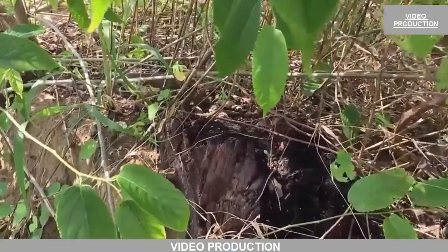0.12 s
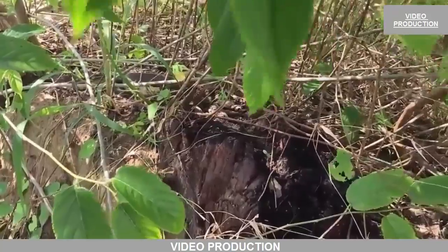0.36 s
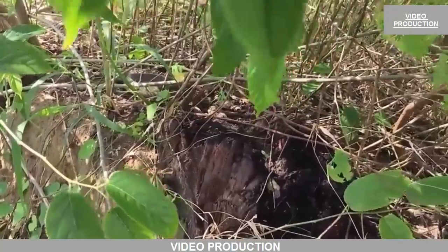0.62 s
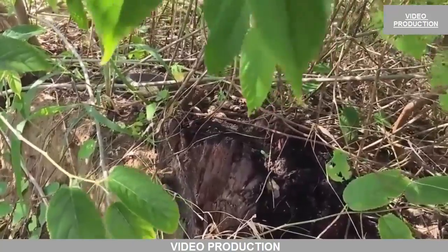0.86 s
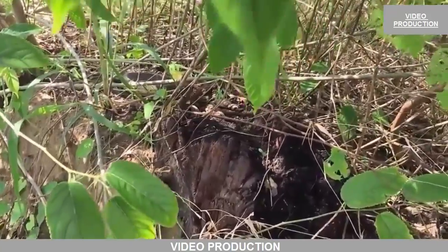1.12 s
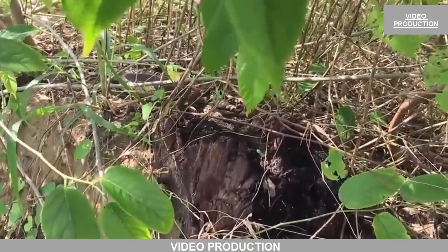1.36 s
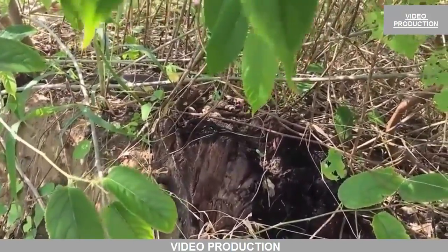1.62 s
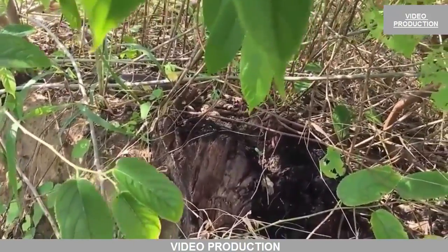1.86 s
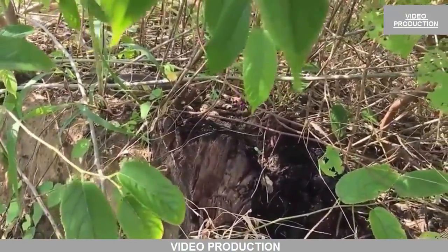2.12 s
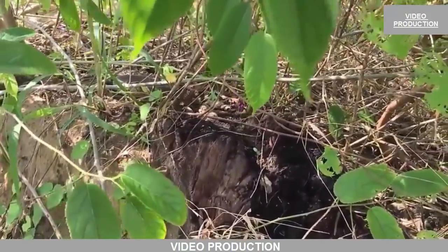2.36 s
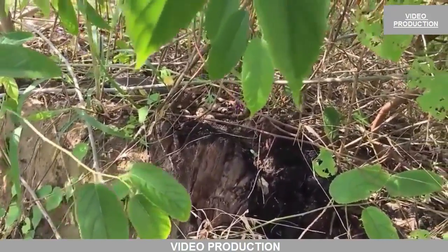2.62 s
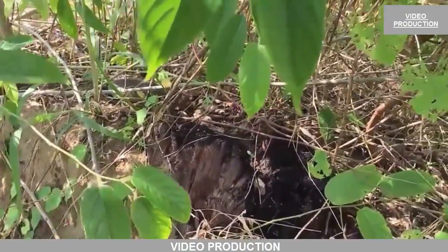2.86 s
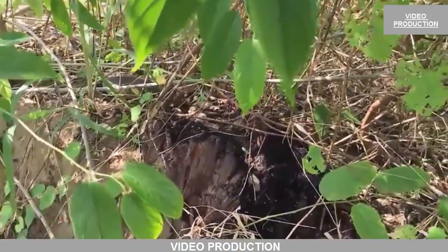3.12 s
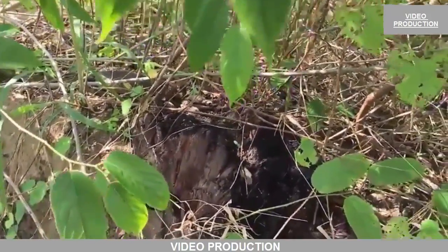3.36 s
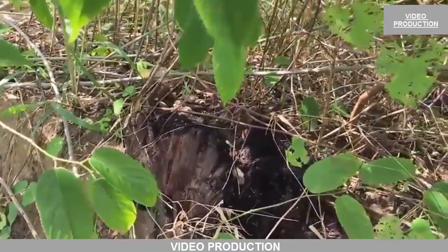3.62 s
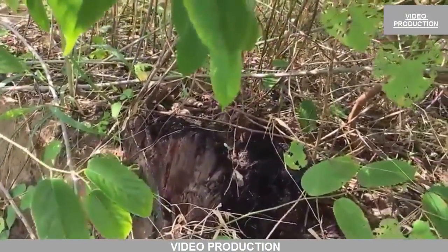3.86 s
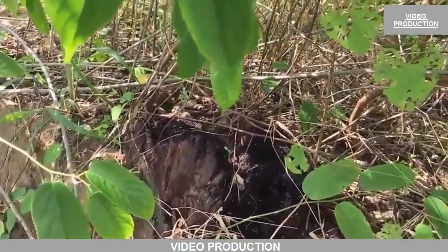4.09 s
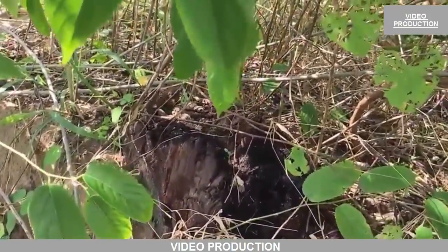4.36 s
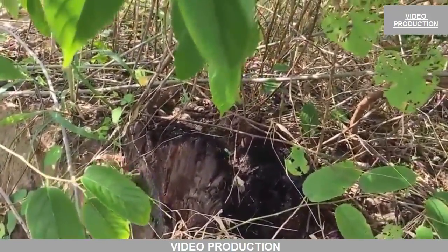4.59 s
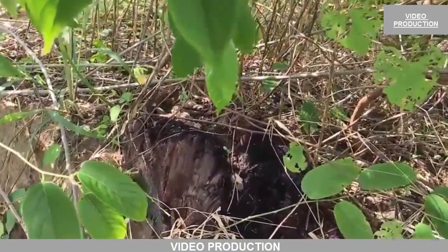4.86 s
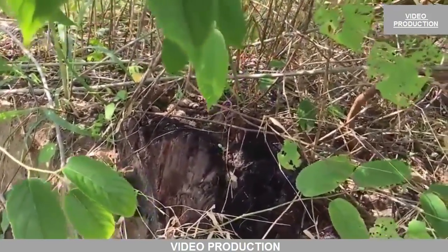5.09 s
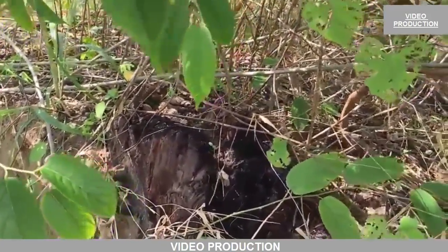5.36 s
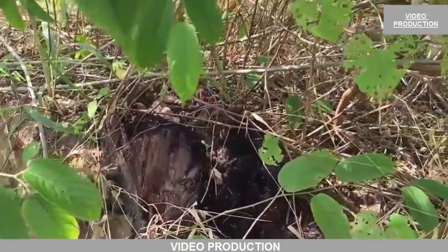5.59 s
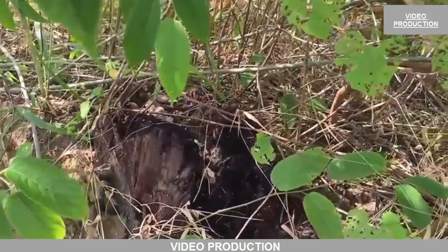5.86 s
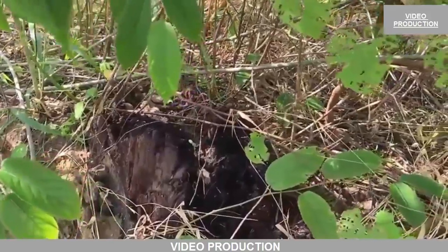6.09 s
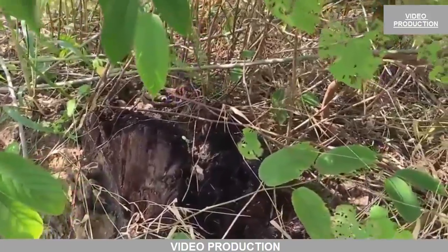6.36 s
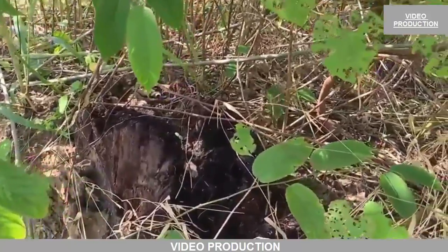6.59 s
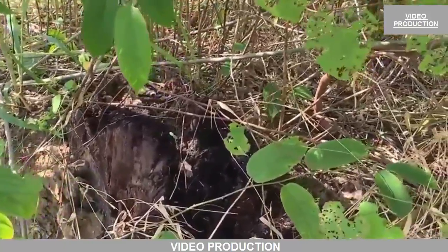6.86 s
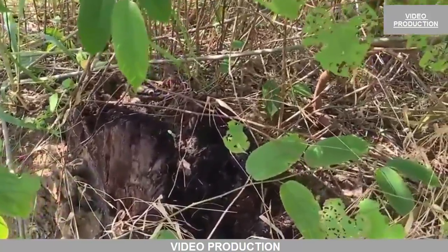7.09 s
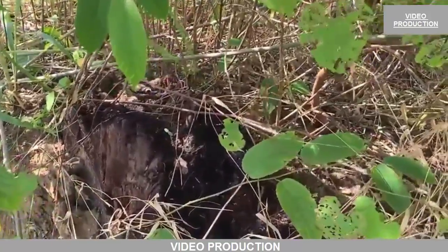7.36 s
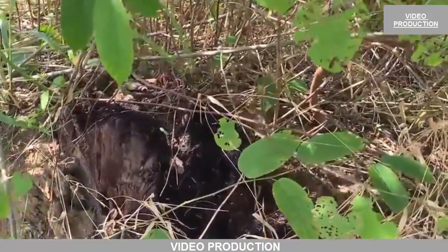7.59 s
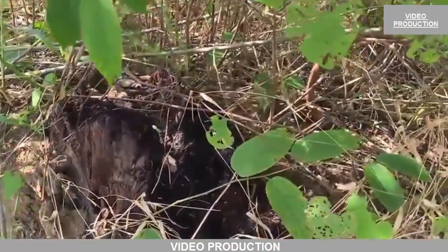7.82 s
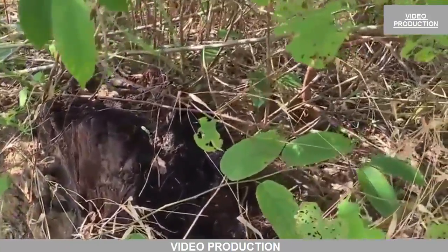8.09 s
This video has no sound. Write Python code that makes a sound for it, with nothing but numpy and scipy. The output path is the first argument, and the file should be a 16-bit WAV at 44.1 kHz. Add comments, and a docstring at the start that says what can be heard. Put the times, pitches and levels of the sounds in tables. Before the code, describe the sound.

A close, dry outdoor sound on a handheld phone. At 0 s leaves are already rustling loudly, with a hard bright crack at 0.2 s and another leafy swell near 0.4 s, fading by 0.8 s. From 1 to 3 s it is quiet: tiny ticks, faint woody taps, a few crisp clicks around 2.6 s, and soft low breeze buffets, strongest in the first 1.6 s. At 3.35-3.7 s several loud twig snaps crack together, then a branch drags free from 3.8 s, its swish fading over half a second. Single snaps at 4.6 and 4.9 s lead to a crackly cluster at 5.1-5.5 s. It thins around 6 s, with a short leafy brush at 6.65 s. From 7.2 to 7.9 s sharp snaps crowd in, brightest at 7.7 s, with low woody knocks and rustling, easing off by 8.2 s. Distant foliage hisses faintly throughout.

```python
"""Leaves rub in swells of tiny crackles as someone pushes through dry litter and thin twigs, close to
a handheld phone outdoors. The crackles are random breaks that shake bands of noise; twigs and stems snap
in short bright noise bursts, and thicker twigs knock with decaying tones.
A light breeze rumbles low on the microphone as slow-varying low noise; far foliage hisses faintly."""
import sys
import numpy as np
from scipy import signal
from scipy.fft import rfft, irfft
from scipy.io import wavfile
from scipy.ndimage import uniform_filter1d

SR = 44100
rng = np.random.default_rng(int(sys.argv[2]) if len(sys.argv) > 2 else 0)


def put_to_file(sound):
    """Save the sound as 16-bit audio at rate SR, in the file named by the first command-line argument."""
    columns = np.atleast_2d(sound).T  # one column per channel
    safe = np.clip(columns, -1, 1)
    whole_steps = np.round(safe * 32767)
    wavfile.write(sys.argv[1], SR, whole_steps.astype(np.int16))


def volts(x):
    """Linear amplitude factor 10**(x/20) for a level x in dB, scalar or array-like."""
    e = np.asarray(x, float) / 20
    return 10 ** e


N = 362214


def curve(table):
    """Level in dB per sample, joined by straight lines in time."""
    time_s, level_db = np.transpose(table)
    return np.interp(np.arange(N) / SR, time_s, level_db)


def unit(x):
    """Scale to rms 1."""
    return x / np.sqrt(np.mean(x ** 2))


def colour(x, points):
    """Filter with (Hz, dB) points, joined on a log-frequency axis."""
    hz, db = np.transpose(points)
    f = np.fft.rfftfreq(len(x), 1 / SR) + 1
    gain = volts(np.interp(np.log(f), np.log(hz), db))
    return irfft(rfft(x) * gain, len(x))


def band(x, lo_hz, hi_hz):
    """Band-pass."""
    return signal.sosfilt(signal.butter(2, [lo_hz, hi_hz], "band", fs=SR, output="sos"), x)


def walk(rate_hz):
    """Random levels held 1 / rate_hz and slewed twice; spread near 1."""
    hold = int(SR / rate_hz)
    steps = np.repeat(rng.standard_normal(N // hold + 1), hold)
    slewed = uniform_filter1d(uniform_filter1d(steps, hold), hold)
    return 1.3 * slewed[:N]


def crackle(per_s, spread_db, t60_s):
    """How hard leaves shake: tiny breaks of widely spread size, each dying away in a moment."""
    size = volts(spread_db * np.minimum(rng.exponential(size=N), 5))
    breaks = (rng.random(N) < per_s / SR) * size
    pole = np.exp(-np.log(1000) / (t60_s * SR))
    return unit(signal.lfilter([1], [1, -pole], breaks))


# steady stirring of the litter: (time [s], level [dB])
STIRRING = [(0.0, -31), (0.3, -32.5), (0.6, -43), (1.0, -54), (1.8, -57), (2.2, -48), (2.9, -57.5),
            (3.3, -38.5), (3.65, -47.5), (4.3, -57), (4.9, -42), (5.5, -46.5), (5.8, -56.5), (6.05, -44),
            (6.5, -54), (7.05, -57), (7.3, -56), (7.9, -51.5), (8.21, -45.5)]
# pushes into the leaves: (peak time [s], peak level [dB], fall length [s])
PUSHES = [(0.0, -18.5, 0.023), (0.217, -25, 0.1), (0.38, -22.5, 0.22), (0.917, -39, 0.086),
          (1.134, -43.5, 0.094), (1.319, -43.5, 0.13), (1.47, -47, 0.041), (1.665, -49.5, 0.1),
          (2.024, -45.5, 0.13), (2.21, -41, 0.073), (2.677, -49.5, 0.41), (3.15, -46, 0.05),
          (3.39, -34, 0.1), (3.564, -40.5, 0.43), (3.75, -37.5, 0.14), (4.476, -44.5, 0.093),
          (4.66, -35.5, 0.09), (4.782, -37.5, 0.092), (4.973, -42.5, 0.47), (5.323, -31.5, 0.077),
          (5.466, -37.5, 0.26), (5.975, -49, 0.21), (6.22, -42.5, 0.1), (6.344, -42, 0.16),
          (6.587, -45.5, 0.09), (6.663, -30, 0.047), (6.775, -41.5, 0.071), (6.92, -44, 0.21),
          (7.116, -36.5, 0.083), (7.246, -37, 0.36), (7.348, -39, 0.14), (7.497, -30, 0.037),
          (7.632, -32, 0.28), (7.876, -35.5, 0.11), (8.11, -36, 0.063)]
RISE_SHARE, FADE_DB = 0.66, 21.5  # rise length / fall length; drop from the peak over either length
DRAG_START_S, DRAG_DB, DRAG_LENGTH_S = 3.773, -33, 0.57


def effort():
    """Gain of the leaves: powers of stirring, swelling pushes and a dragged branch that slides free add."""
    t = np.arange(N) / SR
    power = volts(2 * curve(STIRRING))
    for peak_s, peak_db, length_s in PUSHES:
        away = np.where(t < peak_s, (peak_s - t) / RISE_SHARE, t - peak_s) / length_s
        power = power + volts(2 * (peak_db - FADE_DB * np.minimum(away, 5)))
    catch = np.clip((t - DRAG_START_S) / 0.0023, 0, 1)
    slide_db = DRAG_DB - FADE_DB * ((t - DRAG_START_S) / DRAG_LENGTH_S) ** 2
    power = power + catch * volts(2 * slide_db)
    return np.sqrt(power)


# colour shared by leaves and snaps, with the phone microphone's dips in it:
# (frequency [Hz], level per Hz [dB])
SHARED_COLOUR = [(150, 0), (250, -5.5), (804, -9.5), (2220, -3.5), (2820, -5.5), (3710, -2), (4890, -3),
                 (6010, 0), (7910, -2.5), (9080, 0), (10600, -5), (12400, -1.5), (15200, -3.5)]
RUB_POWER = 0.9


def rustle():
    """Leaves crackle partly all together, partly size by size, over a smooth rub; stiff ones ring briefly."""
    together = crackle(400, 2.5, 0.02)
    out = np.zeros(N)
    for hz in 250 * 2 ** np.arange(0, 6.3, 0.5):  # one leaf size per half octave
        slow = crackle(80, 2.5, 0.055)
        quick = crackle(100, 2.2, 0.0091)
        shake = np.sqrt(together ** 2 + 0.53 * slow ** 2 + 0.14 * quick ** 2 + RUB_POWER)
        leaves = band(shake * rng.standard_normal(N), hz / 2 ** 0.25, hz * 2 ** 0.25)
        out = out + leaves * volts(1.6 * walk(20))
    for hz in 600 * 25 ** rng.random(30):
        strikes = crackle(15, 2.0, 0.04) * rng.standard_normal(N)
        out = out + 0.7 * signal.lfilter(*signal.iirpeak(hz, hz / 250, SR), strikes)  # 250 Hz wide
    out = out * volts(walk(50))
    return unit(colour(out, SHARED_COLOUR)) * effort()


# breeze: (time [s], level [dB])
BREEZE = [(0.0, -52), (0.09, -29.5), (0.16, -43.5), (0.82, -37), (1.3, -48.5), (1.37, -34.5), (1.53, -39),
          (1.58, -34.5), (2.4, -49), (3.75, -44.5), (5.85, -53), (6.63, -47.5), (6.72, -61), (6.97, -49.5),
          (7.5, -58.5), (7.55, -45), (7.61, -57.5), (8.21, -48)]
# breeze colour: (frequency [Hz], level per Hz [dB])
RUMBLE = [(12, -31), (20, -31), (47, 2), (70, 3.5), (129, -12), (206, -33.5), (289, -74), (880, -120)]


def breeze():
    """Eddies of air buffet the microphone port in low pushes; stronger gusts shed smaller, higher eddies."""
    level_db = curve(BREEZE)
    eddies = unit(colour(rng.standard_normal(N), RUMBLE) * volts(1.2 * walk(8.3)))
    small = band(eddies, 100, 216) * volts(0.5 * (level_db + 29.5))
    return (eddies + small) * volts(level_db)


# far foliage colour: (frequency [Hz], level per Hz [dB])
FOLIAGE = [(88, -29), (150, -10.5), (326, -17), (583, -19.5), (877, -23), (1040, -21.5), (15500, -42)]
FOLIAGE_DB = -62


def air():
    """Distant foliage hisses smoothly: coloured noise with a slight drift in level."""
    return unit(colour(rng.standard_normal(N), FOLIAGE)) * volts(FOLIAGE_DB + 1.5 * walk(12))


# twig and stem snaps; dull and bright parts are relative to the shared colour:
# (time [s], peak level [dB], dull part [dB], bright part [dB], t60 [s])
SNAPS = [(0.2105, 3, -2, 22, 0.021), (0.2284, -23.5, 15, -10, 0.14), (0.9306, -25.5, -5, -18, 0.05),
         (1.2002, -30.5, -2, -30, 0.019), (1.2488, -31, -4, -10, 0.048), (1.356, -23.5, -23, 3.5, 0.04),
         (1.4752, -27, -0.5, -3.5, 0.039), (1.524, -34.5, -12, -2, 0.022), (1.5828, -36, 3, 1, 0.03),
         (1.7542, -41.5, 19, -20, 0.049), (2.446, -38.5, 11, -10, 0.062), (2.606, -26.5, -20, 10, 0.043),
         (2.6197, -26, -18, 12, 0.05), (2.6377, -18, 2, 4, 0.065), (2.664, -28.5, 7, -2, 0.046),
         (2.9568, -26.5, 3, 4, 0.086), (2.997, -26.5, 5.5, -18, 0.05), (3.1587, -23, 2, -0.5, 0.091),
         (3.3643, -10, 1, 11, 0.032), (3.4012, -5, -6, 7, 0.057), (3.4048, -9, 6.5, 11.5, 0.043),
         (3.4508, -16, -24, -4, 0.027), (3.486, -18, -13, 8, 0.086), (3.533, -15, 2, -1.5, 0.078),
         (3.551, -25.5, 20, -12, 0.034), (3.589, -26, -4, -2, 0.068), (3.7071, -10.5, 3.5, 6, 0.044),
         (3.776, -19, -8, -5, 0.042), (4.179, -26, 6, 2, 0.098), (4.2866, -33.5, 11, -16, 0.033),
         (4.348, -32, -10, -6, 0.045), (4.4546, -31, -17, -24, 0.035), (4.626, -12, -6, -13, 0.019),
         (4.654, -26, 4, -9, 0.04), (4.667, -29, 9, -14, 0.069), (4.687, -27, 7, -6, 0.027),
         (4.705, -32, 3, -17, 0.025), (4.868, -9.5, -18, -4, 0.021), (5.078, -15.5, 3, 11, 0.04),
         (5.198, -17.5, -2, 8, 0.044), (5.267, -25, -10, 5, 0.06), (5.2863, -18, -11, -9, 0.044),
         (5.3194, -16.5, 9, -3, 0.025), (5.3296, -14.5, 10, 7.5, 0.082), (5.363, -21.5, 0, 0, 0.029),
         (5.437, -15.5, -24, 6, 0.053), (5.4403, -13, -22, 3, 0.061), (5.4676, -25, -4, -14, 0.027),
         (5.552, -26.5, 15.5, 2.5, 0.14), (5.858, -25, 9.5, 1.5, 0.03), (6.053, -23.5, -5, 6, 0.06),
         (6.226, -17.5, 1, 5, 0.085), (6.353, -17, -40, 4.5, 0.13), (6.5684, -23, -4, -2, 0.031),
         (6.981, -23.5, 5, 0, 0.082), (7.222, -17, -24, -2, 0.072), (7.243, -8.5, 4.5, 7.5, 0.06),
         (7.3345, -12.5, -14, 9, 0.038), (7.356, -3.5, -1.5, 7, 0.032), (7.3753, -17, -36, -5, 0.046),
         (7.4801, -9, 0.5, 2.5, 0.035), (7.4887, -15, -16, 8, 0.05), (7.6074, -15, 2, -5.5, 0.12),
         (7.699, -7, 1, 18, 0.031), (7.7047, -3.5, -14, 17.5, 0.0097), (7.733, -17, -5, 11, 0.29),
         (7.771, -6.5, 6.5, -1, 0.025), (7.8352, -8, -2.5, 0.5, 0.062), (7.8408, -14.5, 2, -2, 0.075),
         (7.861, -14, -41, -20, 0.025), (8.1019, -17, -7, -16, 0.02)]
DULL_HZ, MID_HZ, BRIGHT_HZ = 1200, 5000, 13000
TRAIL_DB, TRAIL_T60_S = -28, 0.29


def snaps():
    """Each break is a ragged burst that rings a few leaves; shaken leaves nearby trail after it."""
    out, t = np.zeros(N + SR), np.arange(SR // 8) / SR
    for time_s, peak_db, dull_db, bright_db, t60_s in SNAPS:
        fall = volts(-60 * t / t60_s) + volts(TRAIL_DB - 60 * t / TRAIL_T60_S)
        # fibres part one after another, so the burst is lumpy
        lumps = np.repeat(volts(3.5 * rng.standard_normal(len(t) // 24 + 1)), 24)[:len(t)]
        lumps[24:72] = volts(4.5)  # the first crack is always firm
        rise = np.minimum(t / (0.026 * t60_s), 1)
        burst = rise * fall * lumps * rng.standard_normal(len(t))
        leaves_hz = 3000 * 5 ** rng.random(5)
        ringing = sum(signal.lfilter(*signal.iirpeak(hz, 8, SR), burst) for hz in leaves_hz)
        burst = colour(burst + 0.5 * ringing, SHARED_COLOUR)
        tilt = [(300, dull_db - 9), (DULL_HZ, dull_db), (MID_HZ, 0), (BRIGHT_HZ, bright_db)]
        burst = colour(burst, tilt)
        at = int(time_s * SR)
        out[at:at + len(t)] += burst / np.abs(burst).max() * volts(peak_db)
    return out[:N]


# woody knocks of thicker twigs: (time [s], body tone [Hz], level before jitter and decay [dB])
KNOCKS = [(0.714, 2120, -37), (1.155, 1710, -37), (1.2013, 3700, -33), (1.2013, 2060, -40),
          (1.465, 2200, -43), (1.583, 3280, -41.5), (1.754, 1480, -38), (2.447, 1950, -40),
          (3.551, 1660, -28), (4.2866, 900, -41), (4.8684, 2700, -28.5), (7.6075, 1280, -23),
          (7.772, 1045, -23), (7.772, 2150, -24)]
KNOCK_T60_S, KNOCK_RISE_S, KNOCK_JITTER_DB = 0.017, 0.0009, 2


def knocks():
    """A thick twig rings a body tone, uneven in level, that dies within a few hundredths of a second."""
    out, t = np.zeros(N), np.arange(SR // 10) / SR
    for time_s, hz, level_db in KNOCKS:
        envelope = np.minimum(t / KNOCK_RISE_S, 1) * volts(level_db - 60 * t / KNOCK_T60_S)
        jitter = volts(KNOCK_JITTER_DB * rng.standard_normal(len(t) // 49).repeat(49))
        at = int(time_s * SR)
        out[at:at + len(t)] += envelope * jitter * np.sin(2 * np.pi * hz * t)
    return out


def scene():
    """Leaves, breeze, far foliage, snaps and knocks add at one microphone."""
    return (rustle() + breeze() + air() + snaps() + knocks())[None]


def band_limit(x):
    """A steep low-pass at the top of the band."""
    return signal.sosfilt(signal.butter(12, 17000, fs=SR, output="sos"), x)


TOP_HZ = 15600


def record(dry):
    """The phone cuts the top with a steep low-pass."""
    low_pass = signal.ellip(12, 0.2, 60, TOP_HZ, fs=SR, output="sos")
    mix = signal.sosfilt(low_pass, dry)
    return band_limit(mix)


dry = scene()
out = record(dry)
put_to_file(out)
```